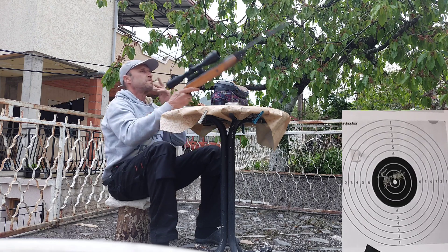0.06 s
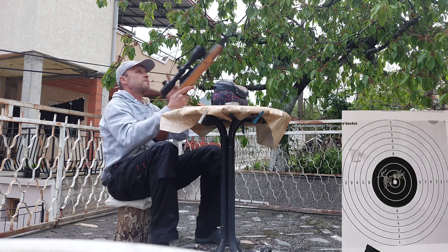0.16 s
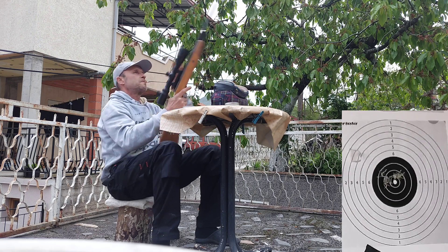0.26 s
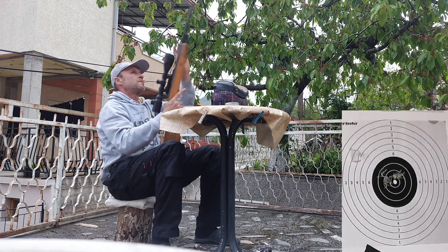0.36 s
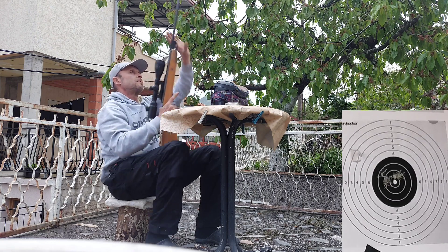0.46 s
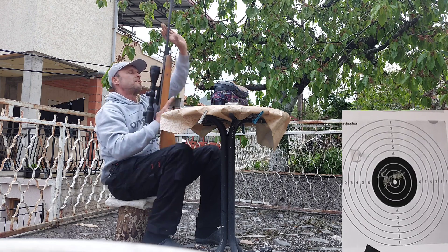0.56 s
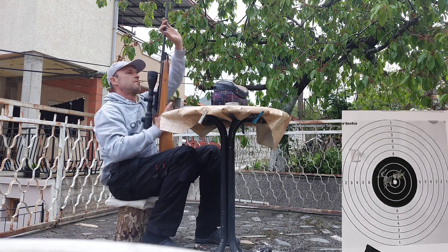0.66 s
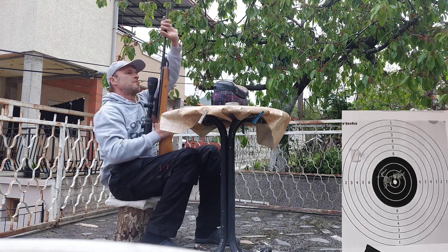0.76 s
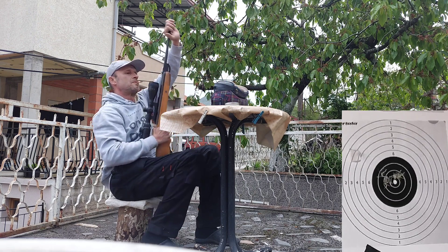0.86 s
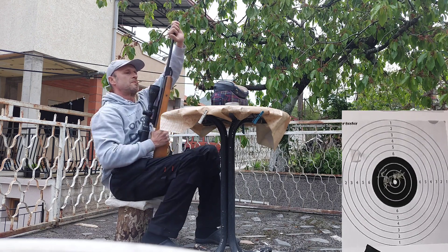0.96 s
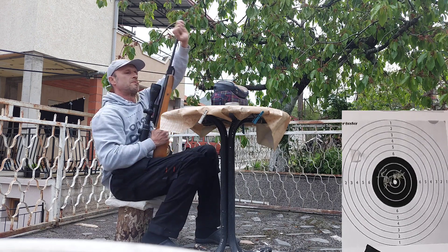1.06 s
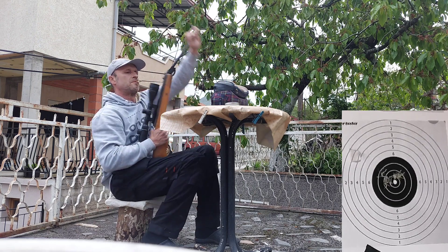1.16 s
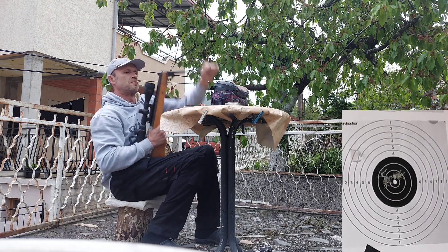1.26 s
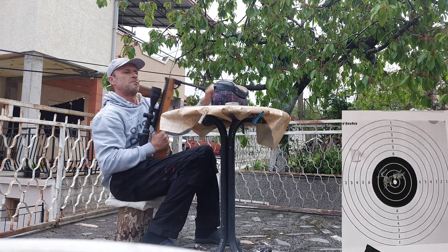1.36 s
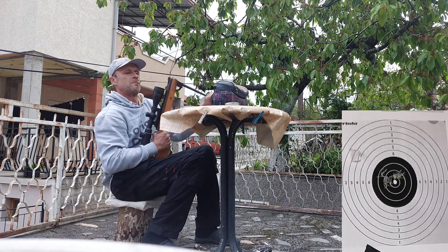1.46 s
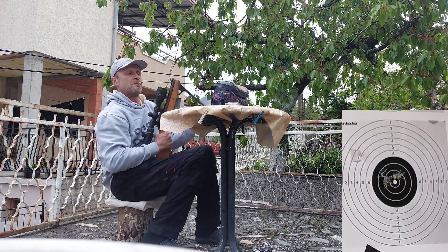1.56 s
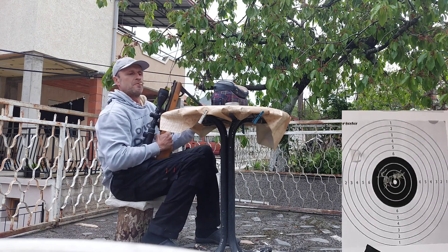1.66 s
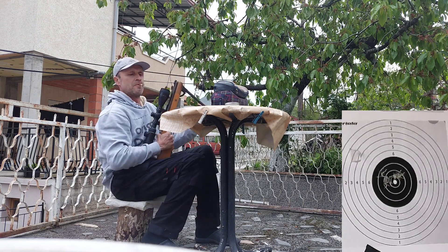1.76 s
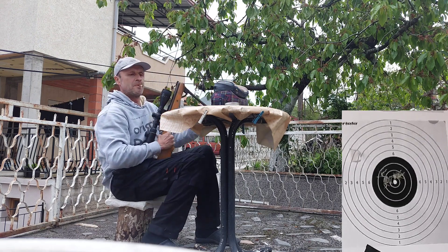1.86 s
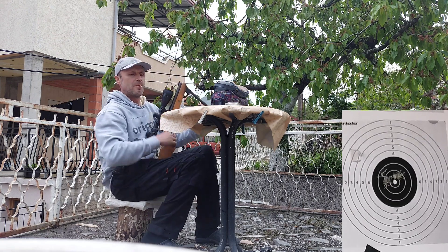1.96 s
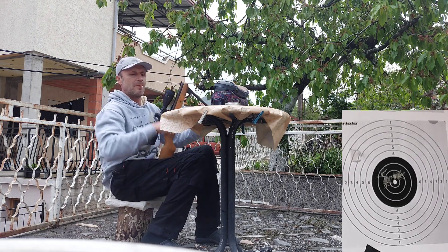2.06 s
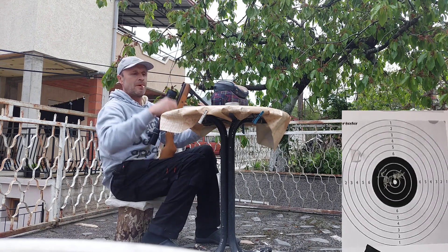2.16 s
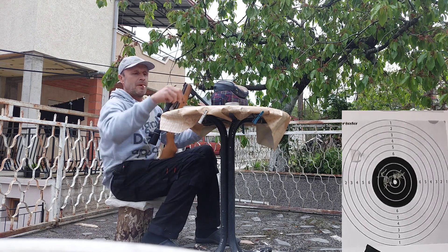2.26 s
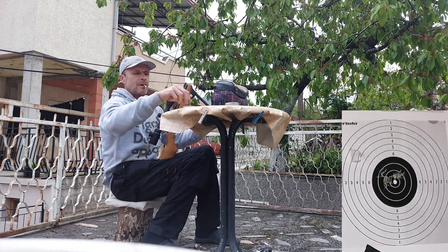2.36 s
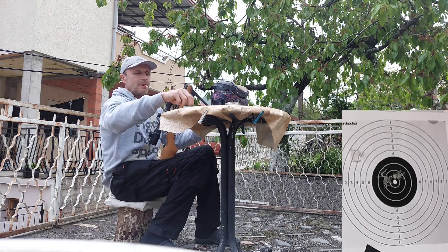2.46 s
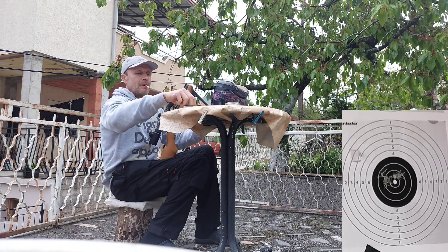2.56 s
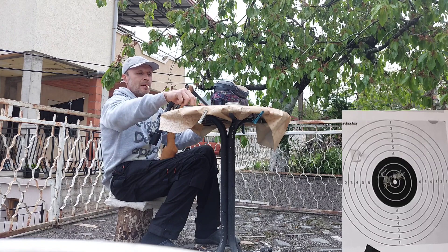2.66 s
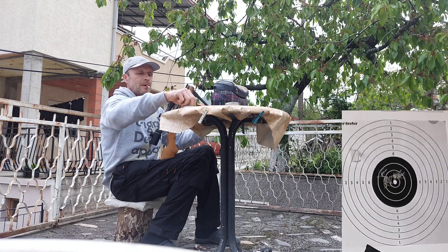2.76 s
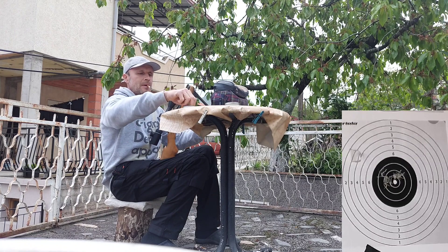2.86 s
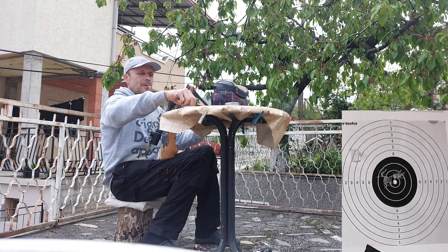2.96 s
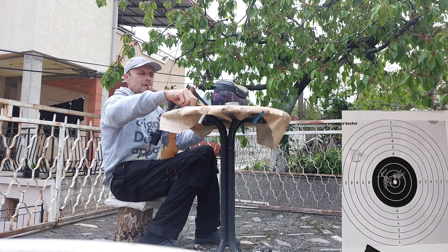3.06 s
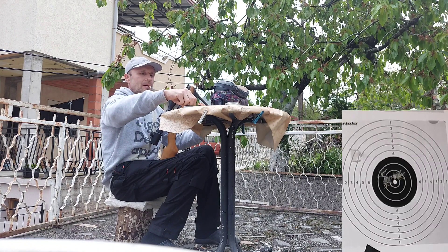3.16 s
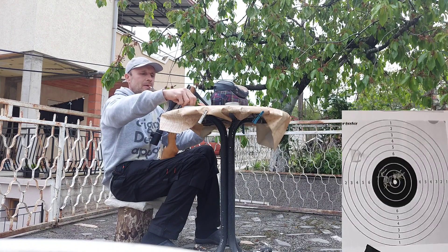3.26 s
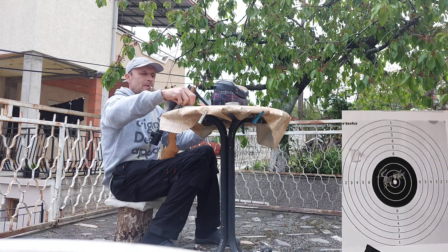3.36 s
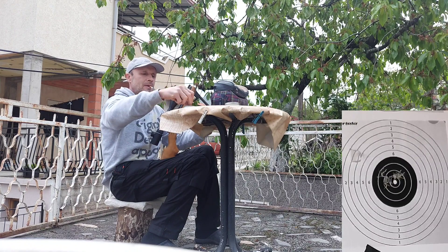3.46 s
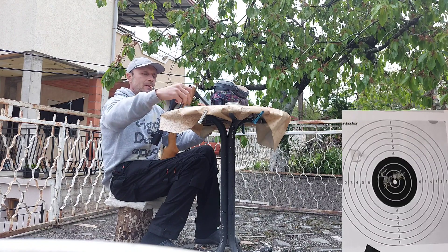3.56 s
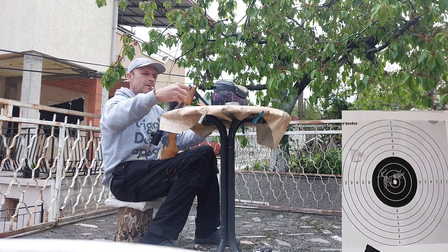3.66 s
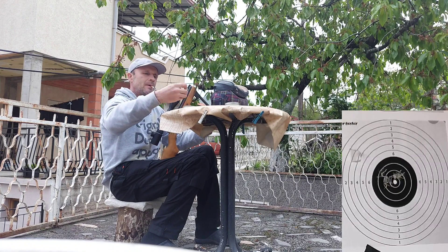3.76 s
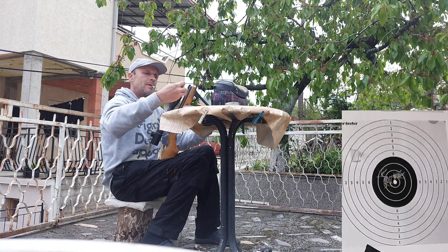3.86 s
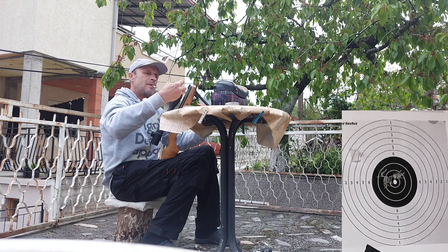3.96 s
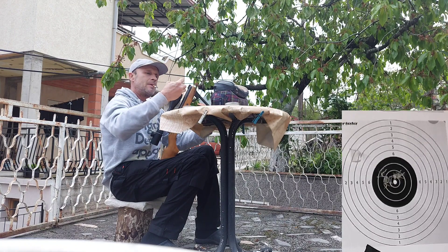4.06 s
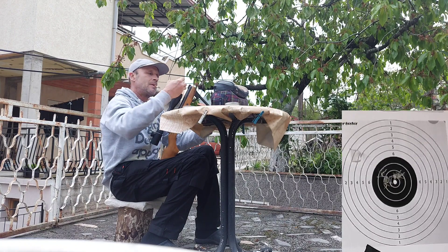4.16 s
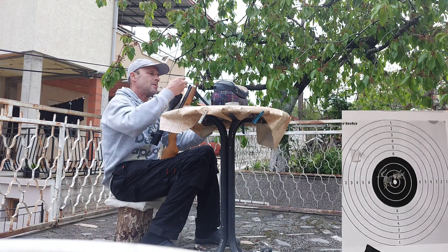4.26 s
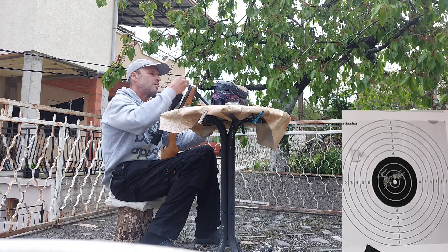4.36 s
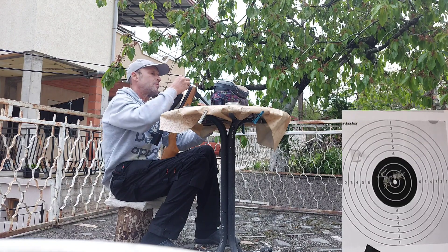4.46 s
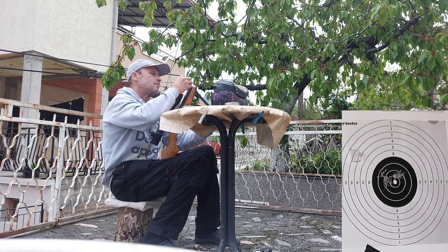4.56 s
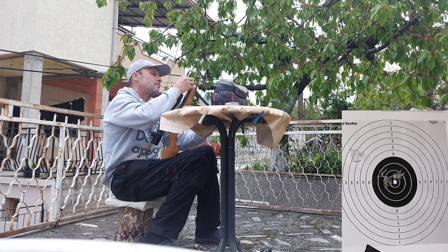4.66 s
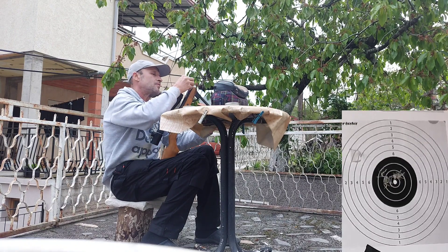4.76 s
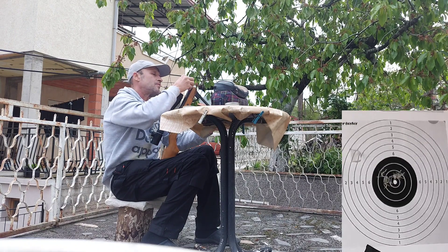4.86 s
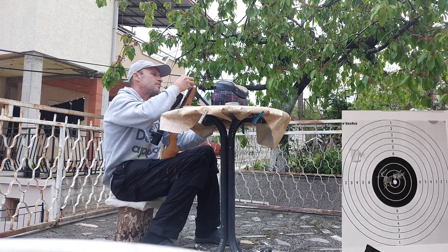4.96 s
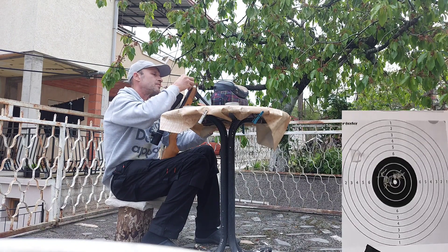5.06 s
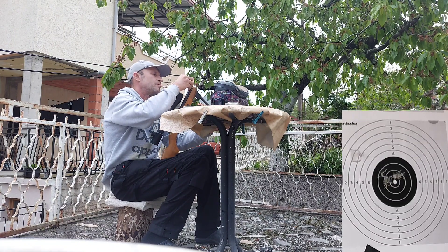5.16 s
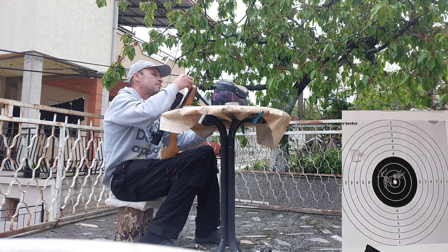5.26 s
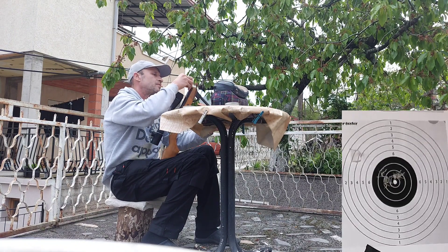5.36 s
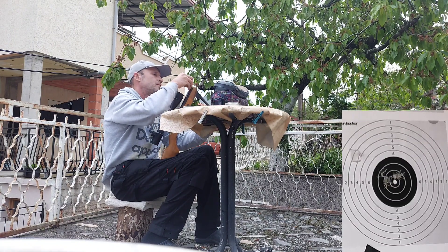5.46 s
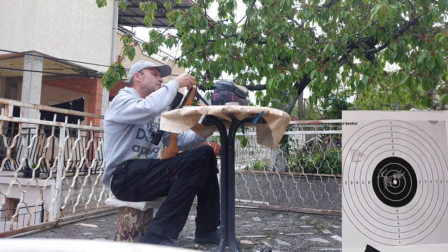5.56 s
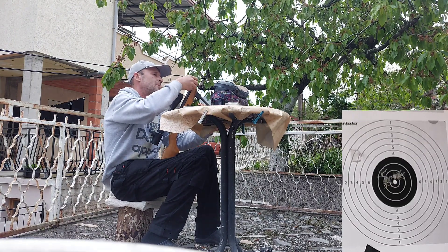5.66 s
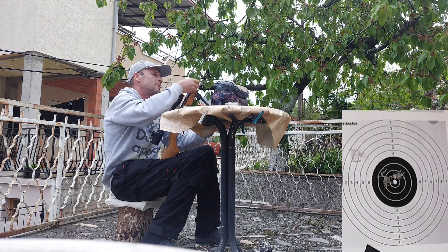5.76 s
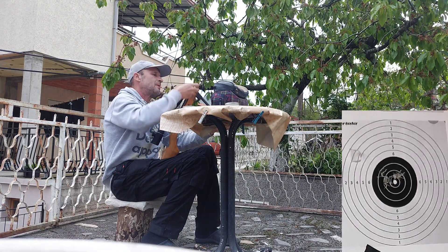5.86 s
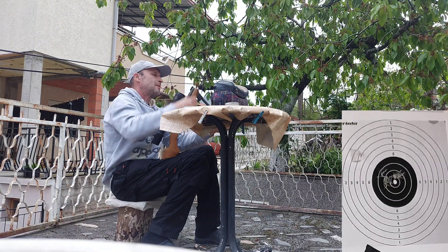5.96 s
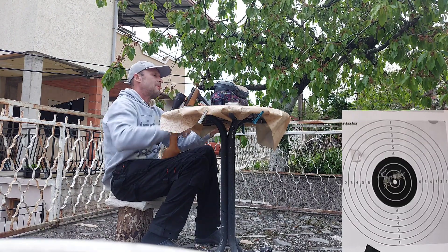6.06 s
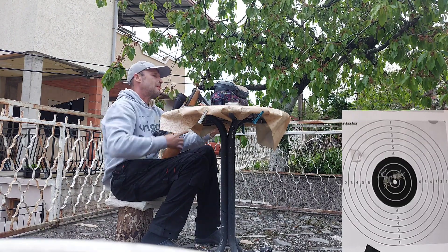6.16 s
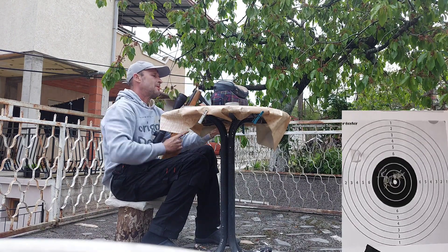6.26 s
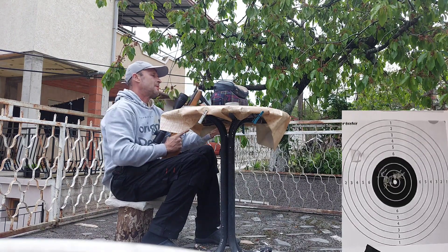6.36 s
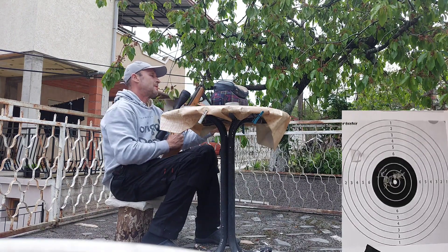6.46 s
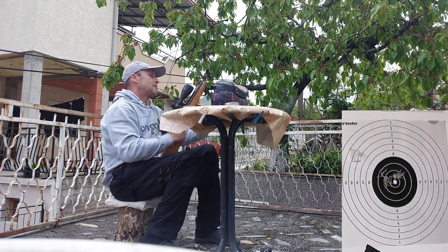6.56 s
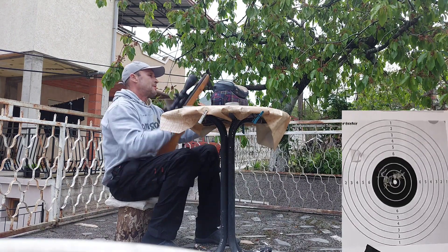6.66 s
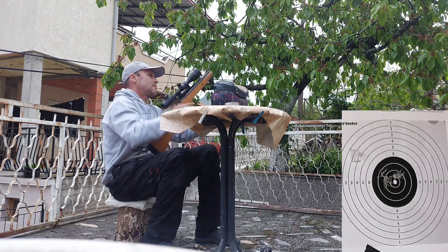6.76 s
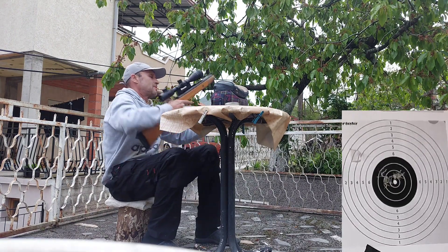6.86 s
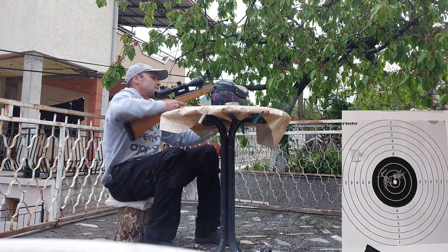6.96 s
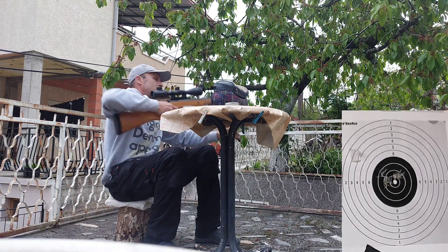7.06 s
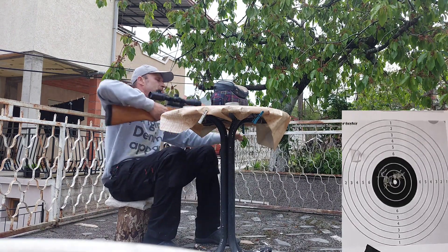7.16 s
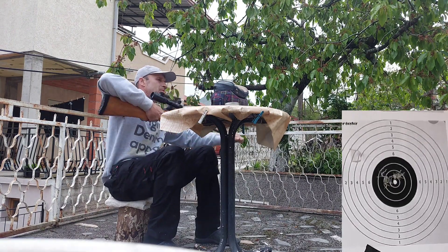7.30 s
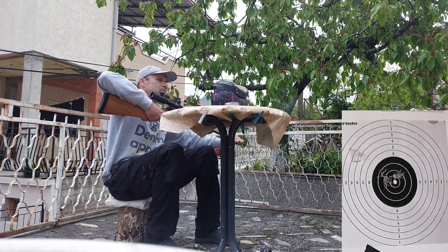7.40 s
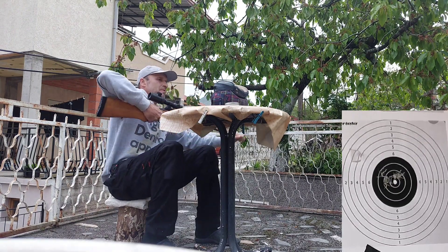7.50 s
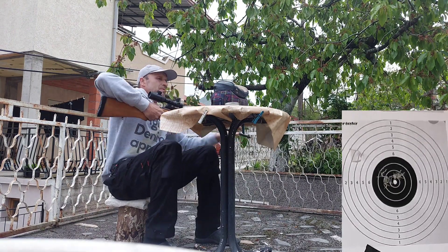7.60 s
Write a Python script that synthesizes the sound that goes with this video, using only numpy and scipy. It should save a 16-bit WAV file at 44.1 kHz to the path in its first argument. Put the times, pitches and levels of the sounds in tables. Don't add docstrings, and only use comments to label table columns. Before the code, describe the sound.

A break-barrel air rifle clacks open loudly, small metal ticks follow from a pellet tin, a sparrow chatters, and the rifle snaps shut outdoors.

```python
import sys
import numpy as np
from scipy import signal
from scipy.fft import rfft, irfft, next_fast_len
from scipy.io import wavfile
from scipy.ndimage import uniform_filter1d, map_coordinates

SR = 44100
rng = np.random.default_rng(int(sys.argv[2]) if len(sys.argv) > 2 else 0)


def to_wav(sig):
    pcm = np.clip(np.atleast_2d(sig), -1, 1) * 32767
    pcm = np.round(pcm).astype(np.int16)
    wavfile.write(sys.argv[1], SR, pcm.T)


def convert_level_to_amplitude(level_db):
    exponent = np.asarray(level_db, float) / 20
    return 10 ** exponent


N = 336615

# f/Hz, level/dB
LOUDER_LEFT = [(60, 8), (200, 8.5), (400, 4), (8000, 6.5), (15000, -1.5)]
# f/Hz, t60/s
GROVE = [(2000, 0.774), (6000, 0.41)]


def unit(x):
    return x / np.sqrt(np.mean(x ** 2) + 1e-20)


def along(points, hz):
    f, v = np.transpose(points)
    return np.interp(np.log(hz + 1), np.log(f + 1), v)


def wobble(rate):
    knots = rng.standard_normal(int(N * rate / SR) + 4)
    return map_coordinates(knots, [np.arange(N) * rate / SR])


def piece(x, s, like):
    return np.take(x, round(s * SR) + np.arange(len(like)), axis=-1, mode="wrap")


def add(x, sound, s):
    at = round(s * SR)
    x[:, at:at + sound.shape[1]] += sound[:, :N - at]


def filtered(x, response):
    n = x.shape[-1]
    m = next_fast_len(n + 2048)
    return irfft(rfft(x, m) * response(np.fft.rfftfreq(m, 1 / SR)), m)[..., :n]


def resonances(modes):
    def response(f):
        total = 0
        for k, (hz, width, db) in enumerate(modes):
            damping = 1j * f * width
            total = total + (-1) ** k * convert_level_to_amplitude(db) * damping / (hz * hz - f * f + damping)
        return total
    return response


def pair(spectrum, alike, lag=0.):
    shared, own = rng.standard_normal((2, N))
    alike = np.clip(alike, 0, 1)
    both = np.array([shared, alike * shared + np.sqrt(1 - alike ** 2) * own])
    sides = np.array([[1], [-1]])

    def ports(hz):
        level = convert_level_to_amplitude(along(spectrum, hz) + sides * along(LOUDER_LEFT, hz) / 2)
        return level * np.exp(1j * np.pi * hz * lag * sides)
    both = filtered(both, ports)
    return both / np.std(both.mean(axis=0))


def tail(decays, walls, seconds=.33):
    hz, t, z = signal.stft(rng.standard_normal((2, round(seconds * SR))), SR, nperseg=128)
    lumps_db = walls * rng.standard_normal((2, 1, len(t))) * convert_level_to_amplitude(-60 * t / 0.36)
    decay_db = -60 * t / along(decays, hz)[:, None]
    answer = signal.istft(z * convert_level_to_amplitude(lumps_db + decay_db), SR, nperseg=128)[1]
    return answer / np.linalg.norm(answer, axis=1, keepdims=True)


def background():
    # t/s, level/dB
    traffic = [(0.0, -71), (0.5, -72.5), (1.19, -67.5), (1.4, -69.5), (2.04, -70.5), (2.32, -73.5),
               (2.78, -70), (3.08, -73), (3.76, -67.5), (4.74, -72.5), (5.27, -71), (5.63, -70),
               (6.03, -73.5), (7.63, -71)]
    fan = [(0, -72), (.5, -70), (1.401, -68.5), (2.0, -72.5), (2.8, -72), (3.76, -73.5), (3.95, -70),
           (4.74, -72.5), (5.63, -72), (6.8, -73.5), (7.219, -70.5), (7.63, -71.5)]
    # f/Hz, level/dB
    rumble = [(12, -36.5), (20, -5.5), (38, -4.5), (64, 1.5), (140, 0.5), (241, -11), (260, -5.5),
              (340, -44), (570, -120)]
    drone = [(120, -47.5), (200, -13), (388, -2), (417, -9.5), (436, 1), (456, -2), (575, -13.5),
             (707, -13), (861, -15), (950, -23.5), (1180, -15.5), (1600, -39.5), (1700, -25), (2210, -51.5),
             (3740, -120)]
    hiss = [(760, -33), (1300, -3), (2120, -0.5), (2490, -5.5), (5760, -10), (6540, -8), (8540, -10.5),
            (9700, -8), (10600, -12), (15200, -12), (16500, -26)]
    # f/Hz, level/dB, width/Hz
    hum = [(150, -82, 6), (454, -80, 4), (9900, -94, 110)]
    t = np.arange(N) / SR
    rumble_db = np.interp(t, *np.transpose(traffic))
    drone_db = np.interp(t, *np.transpose(fan))
    bed = convert_level_to_amplitude(rumble_db + 1.5 + 0.44 * wobble(2.2)) * pair(rumble, 0.52, lag=0.00048)
    bed = bed + convert_level_to_amplitude(drone_db + 2.0 + 1.4 * wobble(15)) * pair(drone, .85, lag=0.00035)
    even = pair([(20, 0), (20000, 0)], .7)
    for hz, db, width in hum:
        bed = bed + convert_level_to_amplitude(db) * unit(filtered(even, resonances([(hz, width, 0)])))
    hiss_db = -83
    return bed + convert_level_to_amplitude(hiss_db + 0.67 * wobble(3.6)) * pair(hiss, .1)


def far_birds(notes, warble, direct_db, bend, wet_db=0, sag_db=-10.5):
    out = np.zeros((2, N))
    drift = 1 + warble * wobble(70)
    air = convert_level_to_amplitude(2.5 * wobble(40))
    attack_s, start_db, fade_s = 0.033, -4.5, .015
    for start, length, from_hz, to_hz, db in notes:
        end = start + length
        t = np.arange(max(start - fade_s, 0), end + fade_s, 1 / SR)
        gate = np.interp(t, [start - fade_s, start, end, end + fade_s], [0, 1, 1, 0])
        peak = start + min(attack_s, length / 2)
        breath_db = np.interp(t, [start, peak, end], [start_db, 0, sag_db])
        hz = from_hz + (to_hz - from_hz) * np.linspace(0, 1, len(t)) ** bend
        phase = 2 * np.pi * np.cumsum(hz * piece(drift, t[0], t)) / SR
        note = gate * convert_level_to_amplitude(db + breath_db) * piece(air, t[0], t) * np.sin(phase)
        add(out, convert_level_to_amplitude(direct_db) * note * np.ones((2, 1)), t[0])
        echo = signal.fftconvolve(note[None], tail(GROVE, walls=3.5), axes=1)
        add(out, convert_level_to_amplitude(wet_db) * convert_level_to_amplitude([[4.5], [.3]]) * echo, t[0])
    return out


def whistling():
    # t/s, length/s, first f/Hz, last f/Hz, peak level/dB
    whistles = [(.275, 0.11, 2034, 2024, -76), (.45, 0.09, 1950, 2110, -77.5), (.56, 0.11, 2400, 2450, -81),
                (.73, 0.15, 2060, 2016, -72), (1.3, 0.24, 2137, 2100, -75), (1.82, 0.18, 2207, 2140, -84.5),
                (2.17, 0.13, 2060, 2070, -83.5), (2.33, 0.075, 2010, 1990, -78),
                (3.52, 0.063, 1870, 1912, -76), (3.86, 0.058, 2197, 2130, -84.5),
                (4.0, 0.2, 2086, 1926, -83), (4.45, 0.21, 2016, 2070, -77), (4.48, 0.28, 2470, 2600, -88),
                (4.5, 0.18, 2260, 2085, -87), (4.88, 0.072, 2307, 2200, -87.5),
                (5.985, 0.061, 2030, 2440, -76.5), (6.08, 0.13, 2294, 2520, -82.5),
                (7.4, 0.23, 2206, 2080, -74.5)]
    pipes = [
        (1.879, 0.053, 4100, 4010, -84),
        (2.08, 0.05, 4320, 4300, -84),
    ]
    clear = [(1.4, 0.13, 2524, 2570, -84), (2.44, .035, 2850, 2830, -87), (2.712, .04, 4070, 4050, -82),
             (2.84, .05, 1930, 1950, -85), (3.93, .04, 2040, 1980, -78), (4.115, .03, 2900, 2860, -82),
             (4.135, .04, 2680, 2640, -87), (4.1, .03, 1760, 1700, -86), (4.345, .08, 2350, 2170, -78),
             (4.43, .05, 2200, 1900, -80), (4.8, .12, 2620, 2200, -78), (.88, .065, 4010, 3960, -76),
             (.345, .03, 4200, 4080, -81), (.4, .03, 4050, 4150, -84), (.64, .03, 4200, 4250, -85),
             (1.085, .04, 3990, 4000, -80), (5.41, 0.23, 2047, 1917, -76.5), (5.71, .15, 1960, 1698, -80)]
    peeps = [
        (.001, .3, 7000, 6600, -86),
        (2.325, .04, 5700, 5000, -85),
        (3.01, .03, 5600, 5000, -90),
        (3.635, .05, 5650, 4850, -87),
        (4.618, .012, 5650, 4700, -85),
        (4.635, .012, 3320, 3280, -87),
    ]
    birds = far_birds(whistles + pipes, warble=.036, direct_db=-6, bend=.8)
    birds = birds + far_birds(clear, warble=0.016, direct_db=1, bend=0.95, wet_db=-7, sag_db=-3)
    return birds + far_birds(peeps, warble=.015, direct_db=0, bend=1, wet_db=-7, sag_db=-3)


def aside(x):
    late = 16
    return np.array([np.pad(x[0], (0, late)), np.pad(x[1], (late, 0))])


def sparrow():
    # t/s, peak level/dB, middle f/Hz
    syllables = [(4.853, -74, 5560), (4.859, -62, 4330), (4.868, -60.5, 4310), (4.879, -51, 5220),
                 (4.9, -49.5, 4610), (4.921, -52, 4770), (4.9444, -60, 4670), (4.9797, -56, 4090),
                 (5.0006, -52.5, 5280), (5.0189, -51, 4600), (5.027, -49.5, 4660), (5.3105, -67.5, 5370),
                 (5.335, -62.5, 4840), (5.3619, -62.5, 4620), (5.385, -57, 4460), (5.577, -67, 5500),
                 (5.5837, -60, 4200), (5.5985, -58.5, 4940), (5.604, -45, 5070), (5.632, -64, 5200),
                 (5.6239, -45.5, 5010), (5.681, -60, 4710), (5.69, -62, 5200), (5.696, -54, 4500),
                 (5.7133, -48.5, 4880), (5.718, -48, 5210), (5.7374, -48, 5060)]
    low_voice = [
        (5.3128, -79.5, 3220),
        (5.3307, -74, 2670),
        (5.3558, -68.5, 2790),
    ]
    sweeps = [(*row, 0.49) for row in syllables] + [(*row, 0.27) for row in low_voice]
    out = np.zeros((2, N))
    u = np.linspace(0, 1, round(.0085 * SR))
    for s, db, hz, octaves in sweeps:
        rough = rng.standard_normal((2, len(u)))
        rasp = unit(uniform_filter1d(uniform_filter1d(rough, size=30), size=30))
        pitch = hz * 2 ** (octaves * (u ** 0.876 - .6) + 0.081 * rasp[1])
        phase = 2 * np.pi * np.cumsum(pitch) / SR
        voices = np.sin(phase) + convert_level_to_amplitude(-28.0 + 3.4 * rasp[0]) * np.sin(2 * phase)
        voices = voices + convert_level_to_amplitude(-22.0) * np.sin(.68 * phase)
        chirp = convert_level_to_amplitude(db - 2.5) * np.sin(np.pi * u) ** .9 * voices
        add(out, aside(chirp * convert_level_to_amplitude([[3.5], [-4.5]] + 3.5 * rasp)), s - .002)
        for late, left, right in rng.random((3, 3)):
            twig_db = -4 - 9.5 * np.array([[left], [right + 0.45]])
            add(out, aside(chirp * convert_level_to_amplitude(twig_db)), s - .001 + 0.005 * late)
        add(out, chirp * convert_level_to_amplitude(-17 + 4 * rasp[::-1]), s + .058)
        trees = signal.fftconvolve(chirp[None], tail(GROVE, walls=4), axes=1)
        add(out, convert_level_to_amplitude([[-3.2], [-6.5]]) * trees, s + 0.01)
    return out


def rubbing():
    # peak t/s, rise/s, fall/s, level/dB, brightness/dB
    strokes = [ (.324, 0.12, 0.42, -79, 3.5), (.606, 0.1, 0.67, -77.5, 6.5),
               (0.769, 0.006, 0.039, -65.5, 10), (.85, 0.1, 0.36, -75, 1.5), (1.121, 0.066, .05, -83, 7),
               (1.348, 0.047, 0.27, -66.5, 2.5), (1.531, 0.038, 0.35, -67, -10),
               (1.635, 0.058, 0.032, -56, -8), (1.772, 0.016, 0.04, -63.5, 2.5),
               (1.81, 0.052, 0.35, -79, 5), (2.56, .09, 0.35, -72, -1), (2.63, 0.11, 0.064, -65.5, -18),
               (2.9, .5, 0.36, -78, -5), (3.386, 0.042, 0.029, -61, -3.5), (3.431, .05, 0.18, -79, -6.5),
               (4.629, 0.059, 0.12, -78, -31.5), (6.38, 0.26, 0.23, -75.5, 8),
               (6.479, 0.079, 0.54, -78.5, -34.5), (6.62, 0.23, 0.25, -69, -2),
               (6.862, 0.32, 0.26, -77, -11.5), (6.99, 0.0087, 0.2, -74, 7),
               (7.066, 0.17, 0.33, -66.5, -7.5), (7.24, .2, 0.29, -81.5, 3), (7.519, 0.095, 0.58, -80.5, 5)]
    # f/Hz, level/dB
    cloth_hiss = [(1760, -53.5), (3000, -50), (3860, -5.5), (5180, -0.5), (6440, -4.5), (13200, -4.5),
                  (16000, -11)]
    cloth_body = [(300, -29), (700, -3.5), (1500, -2.5), (3500, -7.5), (6000, -22.5)]
    cloth_low = [(300, -22.5), (520, 2), (700, 2.5), (950, -12), (1500, -35.5)]
    grain = convert_level_to_amplitude(1.7 * wobble(60) + 0.61 * wobble(540))
    layers = [unit(grain * pair(colour, 0.094)) for colour in (cloth_hiss, cloth_body, cloth_low)]
    s, rise, fall, db, bright_db = np.transpose(strokes)[..., None]
    t = np.arange(0, N / SR, .001)
    drop_db = 20
    shapes = convert_level_to_amplitude(db - drop_db * np.maximum((s - t) / rise, (t - s) / fall))
    low_db = -7.5 - 0.61 * bright_db
    shares = convert_level_to_amplitude(np.hstack([bright_db, 0 * db, low_db]))
    levels = np.sqrt(shares.T ** 2 @ shapes ** 2)
    return sum(np.interp(np.arange(N) / SR, t, level) * layer for level, layer in zip(levels, layers))


def thuds():
    # t/s,
    # peak level/dB, f/Hz
    pushes = [(0.773, -58.5, 120.5), (1.2, -57, 220), (1.203, -56, 125), (1.615, -55.5, 208),
              (2.6, -64, 133), (3.379, -62.5, 94), (6.857, -71, 127.7), (7.322, -45, 144),
              (1.197, -38, 380), (1.766, -53.5, 417), (1.767, -54.5, 600)]
    knocks = [(1.197, -25, 866), (1.206, -42, 540), (1.62, -48.5, 403), (2.526, -63, 1200),
              (3.35, -59.5, 900), (3.368, -56, 1040), (3.384, -51, 1060), (3.4, -55, 950), (4.62, -62, 640),
              (4.64, -65, 680), (7.07, -60, 800), (7.112, -54, 1040), (7.12, -58, 1300), (7.187, -46, 1065),
              (7.19, -55, 1850), (7.194, -56, 837), (7.314, -28.5, 932)]
    pings = [(.726, -61, 5250), (.77, -62, 4800), (0.802, -61, 2900), (1.591, -58, 8200), (1.62, -42, 5400),
             (1.623, -37, 5530), (1.638, -53, 1290), (1.642, -51, 1700), (1.648, -52, 1400),
             (1.769, -51, 1140), (2.553, -64, 2440), (2.563, -65, 5400), (2.576, -61, 3900),
             (2.777, -67.5, 5200), (2.787, -68, 5100), (2.876, -58, 5200), (2.895, -64, 5300),
             (6.874, -59.5, 2180), (6.88, -59, 2600), (7.018, -47, 3850), (7.025, -58, 5300),
             (7.049, -57, 2400), (7.06, -51, 2430), (7.061, -49, 3800), (7.078, -57, 3900),
             (7.325, -29, 4600)]
    out, t = np.zeros((2, N)), np.arange(SR // 4) / SR
    for s, db, hz in pushes + knocks + pings:
        ring = np.sin(2 * np.pi * hz * t) * convert_level_to_amplitude(-60 * t * hz / 26) * (1 - np.exp(-t * hz / 0.54))
        lean_db = along(LOUDER_LEFT, hz) - 3.5
        add(out, convert_level_to_amplitude(db + 0.5 + lean_db * np.array([[.5], [-.5]])) * ring, s)
    return out


def contacts(table, metal, ring, ring_db, chatter, wet_db):
    # f/Hz, width/Hz, level/dB
    edge = [(10670, 2800, -0.1), (13000, 3000, 1), (14100, 360, -4.5), (15300, 1500, -6)]
    barrel = [(1915, 440, 1.5), (2600, 630, 1), (3430, 1100, -6), (4600, 900, -8), (1400, 400, -9.5)]
    stock = [(417, 210, -12), (720, 30, -3.5), (865, 210, -9.5), (1140, 170, -5.5)]
    # f/Hz, t60/s
    yard = [(300, 0.4), (1000, 0.22), (2000, 0.29), (6000, 0.24), (12000, 0.23), (15500, 0.13)]
    grit, grit_db, bite_s = 10, 3.5, .0002
    out, t = np.zeros((2, N)), np.arange(SR // 16) / SR
    for s, db, edge_db, barrel_db, stock_db, echo_db in table:
        shared, left, right = rng.standard_normal((3, len(t)))
        blows = np.r_[1, 1, rng.standard_normal(len(t))]
        blows = np.repeat(blows, grit)[:len(t)]
        envelope = convert_level_to_amplitude(grit_db * blows) * np.exp(-(t / chatter) ** 2) * (1 - np.exp(-t / bite_s))
        force = (shared + 0.48 * np.array([left, right])) * envelope
        blow = (t == 0) * np.linalg.norm(force[0])
        rung = []
        for hz, width, mode_db in ring:
            detune, scatter = rng.standard_normal(2)
            rung.append((hz * (1 + .025 * detune), width, mode_db + 5 * scatter))
        parts = ((metal, 0), (rung, ring_db), (edge, edge_db), (barrel, barrel_db), (stock, stock_db))
        hit = 0
        for modes, part_db in parts:
            part = filtered(np.vstack([force, blow]), resonances(modes))
            hit = hit + convert_level_to_amplitude(db + part_db) * part / np.abs(part[:2].mean(axis=0)).max()
        late = 5
        direct = convert_level_to_amplitude([[4.5], [2.5]]) * np.array([hit[0], np.roll(hit[1], late)])
        add(out, direct, s)
        add(out, direct * convert_level_to_amplitude([[-12], [-14]]), s + 0.0058)
        walls, seconds = (6, .33) if db > -45 else (3, .18)
        echo = signal.fftconvolve(hit[2:], tail(yard, walls, seconds), axes=1)
        add(out, convert_level_to_amplitude(wet_db + echo_db) * convert_level_to_amplitude([[1.5], [-1.2]]) * echo, s + 0.0028)
    return out


def pellet_tin():
    # t/s, peak level/dB, edge level/dB, weight level/dB, wood over weight level/dB
    tin = [(2.5127, -60.5, -13, -6, -1), (2.529, -67, -15, 0, -3), (2.5518, -57, -19, -2, -14),
           (2.574, -59.5, -19, 0.5, -7), (2.617, -58, -11, 5, -8.5), (2.775, -66.5, -13, -8.5, -11),
           (2.791, -63, -15.5, -4.5, -5), (2.803, -70, -15, 4, -6.5), (2.8758, -57, -28, -8.5, -14),
           (2.893, -61, -22, -6, -6), (2.911, -54.5, -14.5, -6, -6.5), (3.001, -66, -21, -4.5, -7.5),
           (3.1247, -66, -18, 1, -5.5), (3.1648, -62.5, -28.5, -2.5, -16), (3.268, -65.5, -8, -4.5, -5.5),
           (3.3442, -54, -8, -10, 5), (3.364, -69, -5, -9, -2), (3.376, -56.5, -3, -5, -0.5),
           (3.3828, -61, -11, -3.5, 6), (3.4463, -67, -4, -0.5, -1.5)]
    # f/Hz, width/Hz, level/dB
    lid = [(3900, 640, 1), (5120, 740, 6.5), (7160, 2800, -2)]
    tin_ring = [(3900, 160, 4.5), (4500, 110, -10), (5200, 160, -4), (6050, 110, -5), (6850, 130, -3.5),
                (11500, 70, -10.5), (13200, 70, -7)]
    echo_db = -4
    touches = [(s, db, edge, weight, weight + wood, echo_db) for s, db, edge, weight, wood in tin]
    return contacts(touches, lid, tin_ring, -13, chatter=0.0038, wet_db=7.0)


def rifle():
    # t/s, peak level/dB, edge level/dB, weight level/dB, echo level/dB
    clacks = [(0.726, -55.5, -5, -8, -5.5), (0.767, -56, 19, -12, -14), (0.802, -69, -12, 9.5, -5),
              (0.948, -56.5, 0, -7, -6), (0.9962, -62, -11, -5, -11), (1.1294, -49, -6, -0.5, -5.5),
              (1.1744, -17, -9, -15, -14), (1.18, -30, -2, -14.5, -5.5), (1.1944, -37, 7, -16, -17.5),
              (1.1964, -18.5, 1, -13.5, -6.5), (1.198, -17.5, -8, -5.5, -8), (1.1998, -28, -6, 5, -17),
              (1.2024, -25.5, -11, -3, -9.5), (1.2063, -34, -6, -4, -15), (1.5918, -48.5, -19, -15, -9.5),
              (1.601, -66, -15, 7, -16), (1.6135, -45.5, -8, -22, -14), (1.6172, -44.5, -8, -3.5, -2),
              (1.6195, -44, -2, -4, -14), (1.6222, -53, -6, -2, -16.5), (1.637, -65, -7, 7, -15),
              (1.64, -57.5, -8, 11, -19), (1.647, -64, -3, 6, -6), (1.765, -50, 1, 4.5, -10.5),
              (6.8518, -72, -16, 10.5, -9), (6.8732, -66.5, -21, 7.5, -2.5), (6.989, -51, -11, -5.5, -7.5),
              (7.0155, -48.5, -3, -11.5, -2), (7.023, -64.5, -7.5, 6, 1), (7.035, -68, -6, 3, -8),
              (7.05, -67.5, -9, 12.5, 1.5), (7.0598, -68, -5, 12, 4), (7.079, -70, -7, 11.5, -6),
              (7.088, -71, -14, 10.5, 3), (7.154, -72, -8, 5, -6), (7.184, -60, -24, 10.5, -10),
              (7.3057, -19, -16, -23.5, -12.5), (7.3052, -20, -15, -14.5, -7), (7.3137, -31, -1, -4, 1.5),
              (7.326, -27.5, 2, -9, -1.5), (7.576, -53.5, -13, -14, -15), (7.5895, -59, -26, -3, -4.5)]
    # f/Hz, width/Hz, level/dB
    latch = [(4620, 1700, -4), (7440, 1300, -1.3), (8800, 1100, -10)]
    breech = [(3990, 90, -2.5), (5170, 110, 3), (5070, 120, -6.5), (6250, 100, -3.5), (7150, 41, -4),
              (7665, 95, -2), (8300, 110, -4.5), (11450, 110, -3.5), (13050, 100, -5.5), (13000, 730, -4.5)]
    stock_db = -10
    steel = [(s, db, edge, weight, weight + stock_db, echo) for s, db, edge, weight, echo in clacks]
    return contacts(steel, latch, breech, -9.5, chatter=.0017, wet_db=8.5)


def scene():
    birds = whistling() + sparrow()
    return background() + birds + rubbing() + thuds() + pellet_tin() + rifle()


def top_cut(x):
    return signal.sosfilt(signal.butter(12, 16790, fs=SR, output="sos"), x)


def record(dry):
    top_hz = 15950
    mix = filtered(dry, lambda hz: 1 / (1 + (hz / top_hz) ** 90))
    return top_cut(mix)


dry = scene()
out = record(dry)
to_wav(out)
```